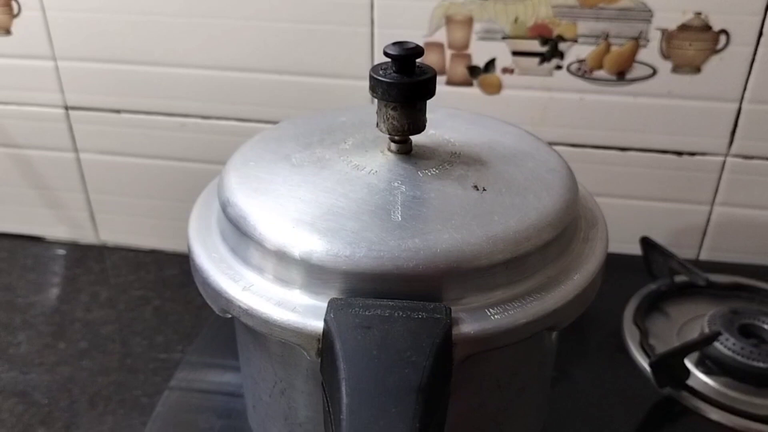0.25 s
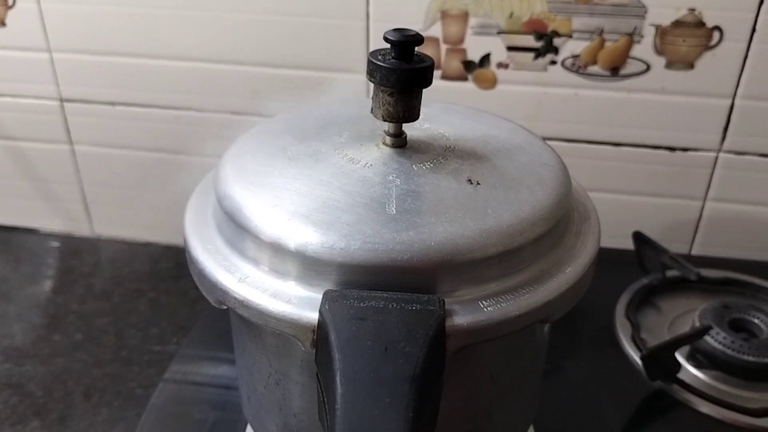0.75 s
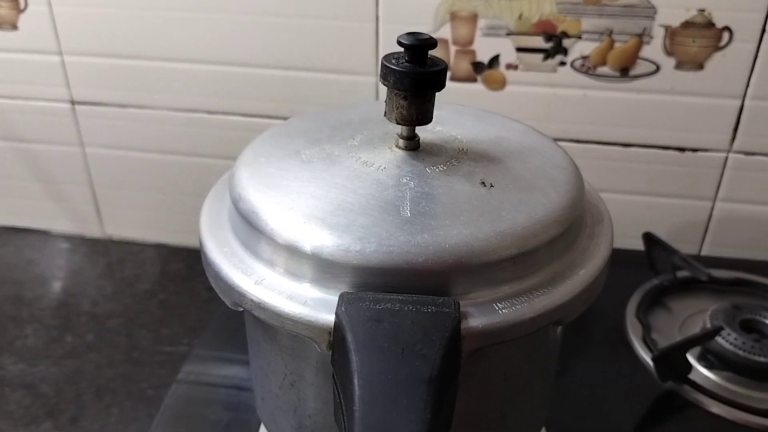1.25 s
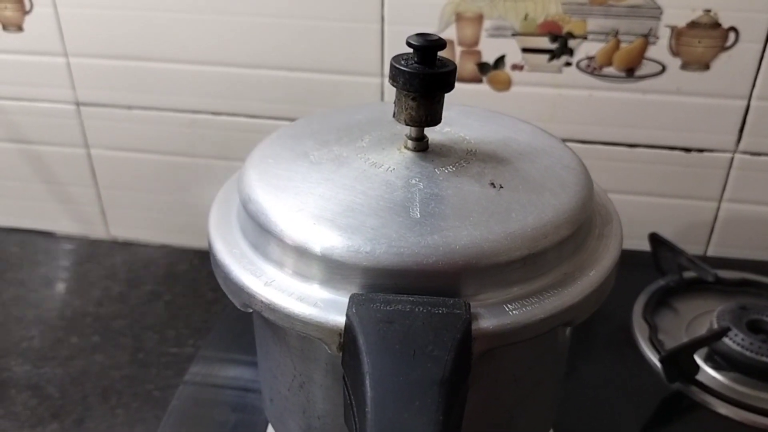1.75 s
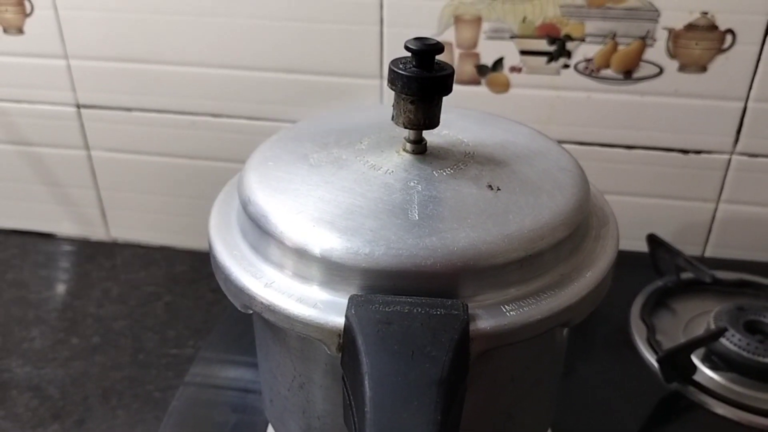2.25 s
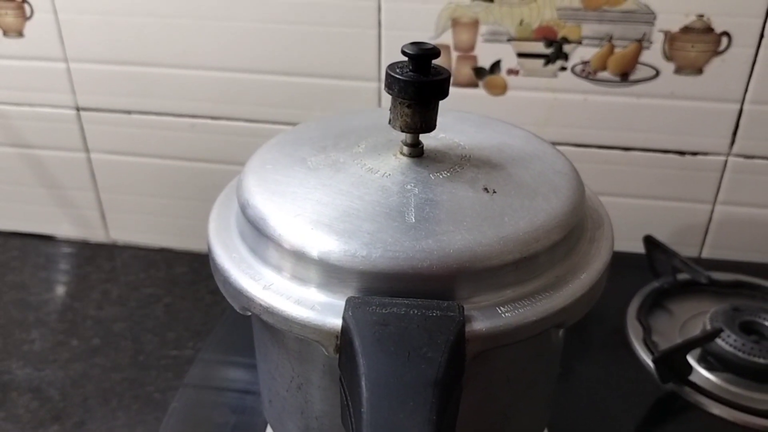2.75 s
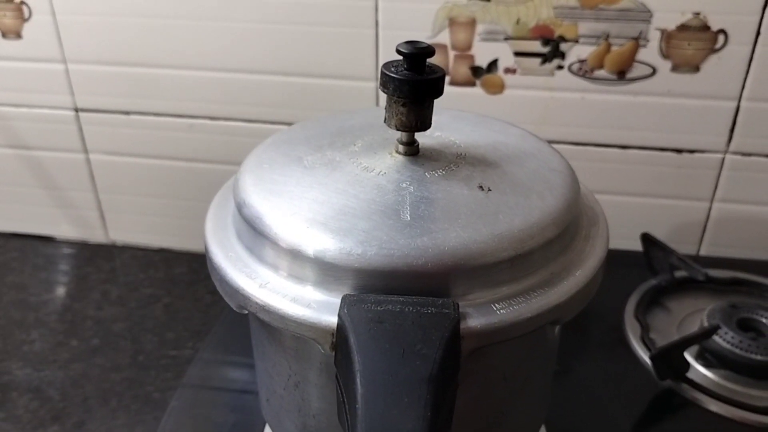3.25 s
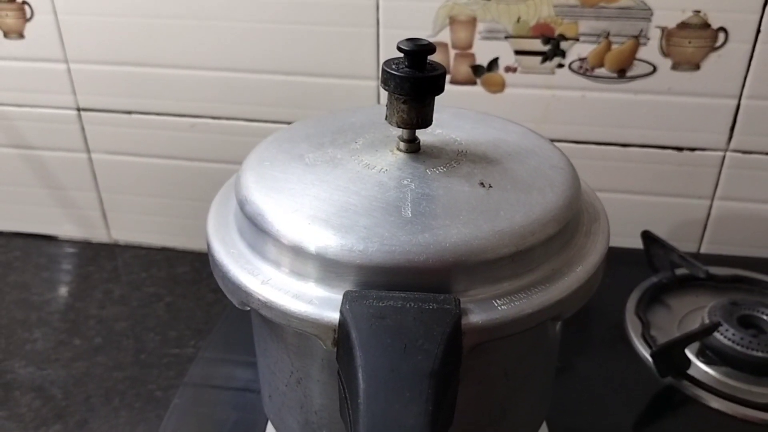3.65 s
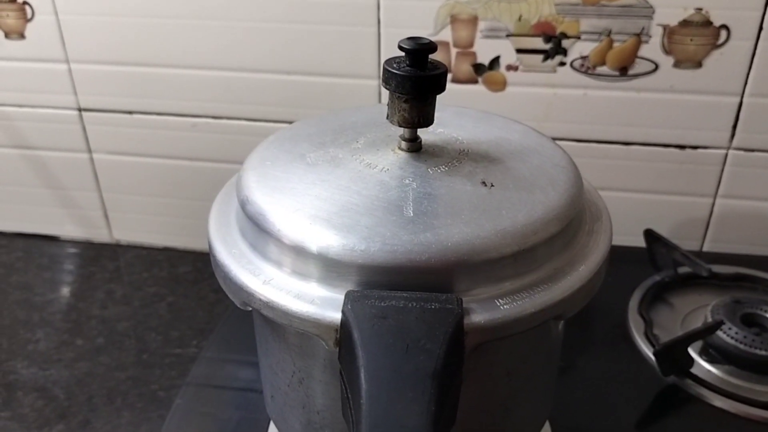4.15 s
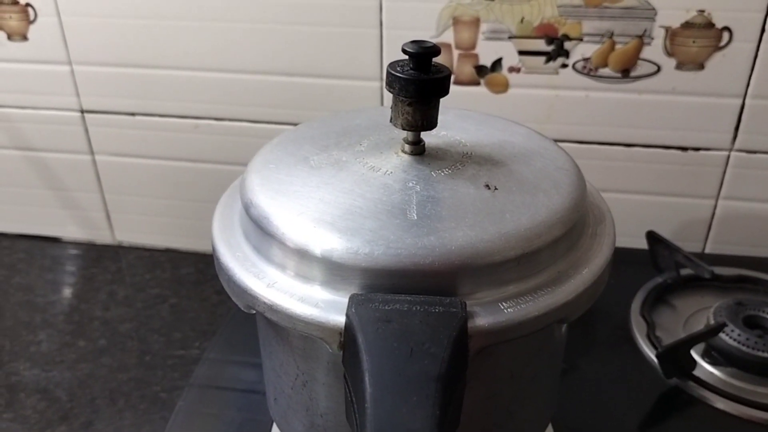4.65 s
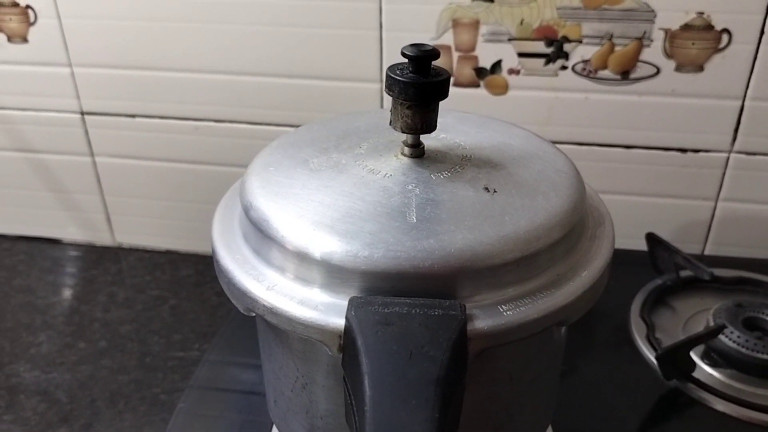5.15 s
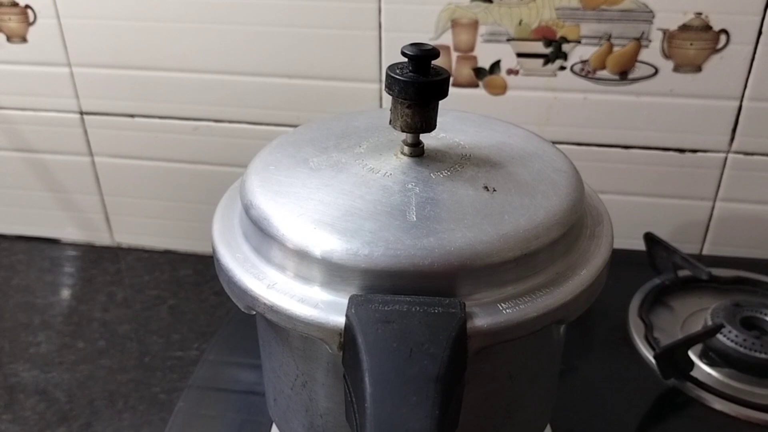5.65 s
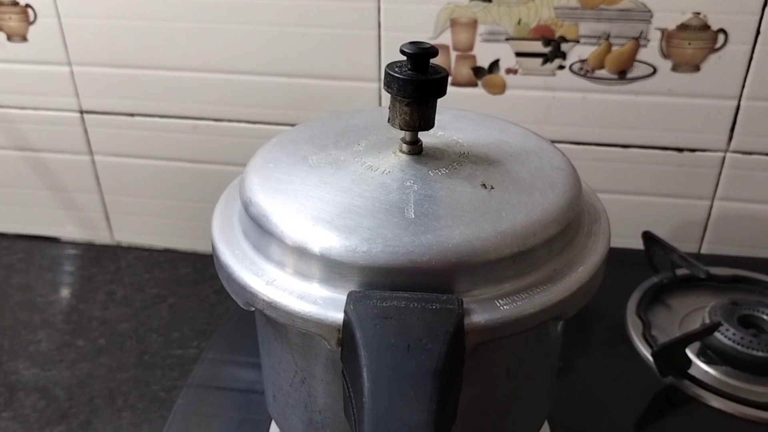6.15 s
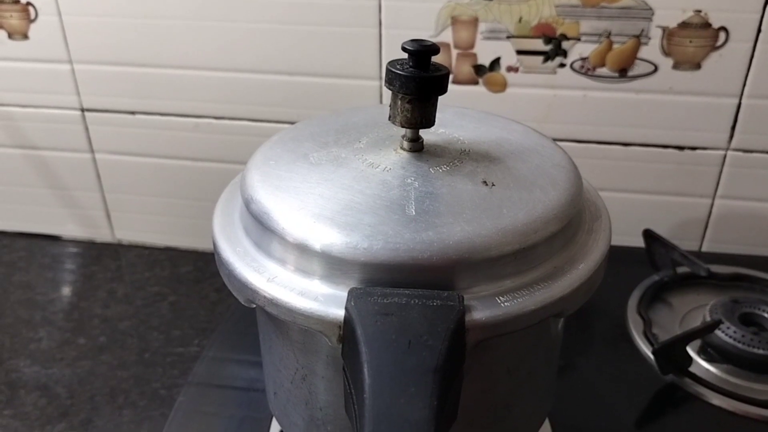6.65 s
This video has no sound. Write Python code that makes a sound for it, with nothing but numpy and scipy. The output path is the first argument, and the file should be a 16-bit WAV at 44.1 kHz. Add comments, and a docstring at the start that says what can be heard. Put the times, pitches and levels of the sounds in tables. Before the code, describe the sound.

From 0 to about 0.16 seconds there is only a faint, low kitchen hum with barely audible thin tones. It cuts to total silence until roughly 0.84 seconds, when a pressure cooker's steam jet arrives abruptly at full blow. The hiss is broad, bright and sizzling, with a hollow ring around the weight and narrow metallic whistle-like colour from vent and lid; an extra shrill edge fades over the first second or so. It softens slightly around 2.5 seconds, then strengthens again by 4 seconds. Steam buffets the close phone microphone: dull, sharp-fronted pops and low rumble, frequent until 2.1 seconds, sparser to about 4, busy again around 4.2-5.2, mostly on the left. From 6.6 seconds the pops crowd together and a tearing, rumbling gust swells, slightly overloaded, as the hiss continues to the end. Tiled walls add short diffuse reflections.

```python
"""A moment of quiet kitchen hum, a silent gap, then a pressure cooker blowing steam past its weight valve.
Filtered noise makes the room and the jet; resonances ring the hollow of the weight, the vent tube and lid.
Tiled walls return the sound as a diffuse field. The phone is so close that eddies of the plume hit its
two microphone ports, each on its own: dull pops from pressure pulses, rumble from low noise.
"""
import sys
import numpy as np
from scipy import signal
from scipy.fft import rfft, irfft, next_fast_len
from scipy.io import wavfile
from scipy.ndimage import uniform_filter1d

SR = 44100
rng = np.random.default_rng(int(sys.argv[2]) if len(sys.argv) > 2 else 0)


def to_wav(sig):
    """Store sig (one row per channel, or 1-D mono) as 16-bit WAV at the path in sys.argv[1].

    Samples outside -1..1 are clipped; the rate is SR.
    """
    pcm = np.clip(np.atleast_2d(sig), -1, 1) * 32767
    pcm = np.round(pcm).astype(np.int16)
    wavfile.write(sys.argv[1], SR, pcm.T)  # frames by channels


N = 304498
TIME = np.arange(N) / SR
SIZE = next_fast_len(N, True)
FREQ = np.maximum(np.fft.rfftfreq(SIZE, 1 / SR), 1)
HUM_END_S, JET_START_S = .161, .835


def undb(db):
    """Logarithmic level: decibels to amplitude gain."""
    return 10 ** (np.asarray(db) / 20)


def level(x, db):
    """Mean power: scale the signal to an rms level."""
    return x * undb(db) / np.sqrt(np.mean(x ** 2))


def curves(table):
    """Linear interpolation: each column of a timed table, sample by sample."""
    times, *columns = np.transpose(table)
    return [np.interp(TIME, times, column) for column in columns]


def shape(x, response):
    """Linear filtering: multiply the spectrum by a response given at every frequency."""
    return irfft(rfft(x, SIZE) * response, SIZE)[..., :N]


def colour(x, outline):
    """Spectral shaping: filter by an f/Hz, level/dB outline, interpolated over log frequency."""
    hz, db = np.transpose(outline)
    return shape(x, undb(np.interp(np.log(FREQ), np.log(hz), db)))


def ring(x, modes):
    """Resonance: modes stirred by turbulence are incoherent, so their powers add."""
    power = 0
    for hz, width, db in modes:
        detuning = hz / width * (FREQ / hz - hz / FREQ)
        power = power + undb(db) ** 2 / (1 + detuning ** 2)
    return shape(x, np.sqrt(power))


def butter(x, hz, kind, order=2):
    """Causal filtering: a Butterworth low-pass or high-pass."""
    return signal.sosfilt(signal.butter(order, hz, kind, fs=SR, output="sos"), x)


def slow_chance(rate_hz):
    """Slow random fluctuation: stepped noise, smoothed, with rms 1."""
    step = max(int(SR / rate_hz), 1)
    steps = np.repeat(rng.standard_normal(N // step + 1), step)
    return level(uniform_filter1d(steps, step)[:N], 0)


# Quiet kitchen noise, relative spectrum: f/Hz, level/dB
ROOM_SPECTRUM = [(20, -22), (50, -7), (85, 0.5), (110, -1), (160, -11), (340, -18), (500, -25), (1100, -25),
                 (2400, -33.5), (4600, -37), (5500, -45), (9000, -50), (15000, -66)]
# Faint thin tones in it, relative peaks: f/Hz, width/Hz, level/dB
THIN_TONES = [(335, 10, 9), (1720, 25, 0), (3100, 63, -3), (3560, 46, -6)]


def quiet_room():
    """Correlation of a sound field: hum and thin noisy tones, with the bass alike at both ports."""
    noise = level(colour(rng.standard_normal((2, N)), ROOM_SPECTRUM), -44)
    tones = level(ring(rng.standard_normal((2, N)), THIN_TONES), -56.5)
    mid, side = noise + tones
    # removing bass from the difference leaves the low end common to both ports
    return mid + butter(side, 500, "high", order=1) * np.array([[1], [-1]])


def pops(rows, length_s, front_s):
    """Pressure pulse: an eddy pushes or sucks at one port; pressure leaks away, so the signal swings back."""
    out = np.zeros((2, N + SR))
    chances = rng.standard_normal((len(rows), 2))
    t = TIME[:SR // 60]
    front = np.exp(-t / front_s)
    for (start_s, push_db, snap_db, port), (way, stretch) in zip(rows, chances):
        # a sharp front, a short hold, then a rounded fall of pressure
        hold = 1 / (1 + (t / (length_s * np.exp(0.15 * stretch))) ** 6)
        push = undb(push_db) * (1 - front) * hold
        snap = undb(snap_db) * front
        i = int(start_s * SR)
        out[int(port > .5), i:i + len(t)] += np.sign(way) * (push + snap)
    leaked = butter(out[:, :N], 11.0, "high")
    return butter(leaked, 4400, "low")


# rate in a draught of GUST_DB, and how steeply the rate follows the draught
EDDY_PER_S, GUST_DB, EDDY_RATE_POWER = 70, -33, .6
# push of the biggest in that draught, its growth in dB per dB of draught,
# range down to the smallest, snap of the front relative to push
EDDY_PUSH_DB, EDDY_GROWTH, EDDY_SCATTER_DB, EDDY_SNAP_DB = -11, 0.52, 20, 2
LEFT_SHARE = .62  # share of these eddies that hit the left port


def eddies(draught_db, count=1400):
    """Random arrivals: the stronger the draught, the more and the harder the lesser eddies come."""
    when, luck, size, side = rng.random((count, 4)).T
    at = (when * (N - 1)).astype(int)
    gust_db = draught_db[at] - GUST_DB
    rate_per_s = EDDY_PER_S * undb(EDDY_RATE_POWER * gust_db)
    hits = luck < rate_per_s * N / SR / count
    push_db = EDDY_PUSH_DB + EDDY_GROWTH * gust_db - EDDY_SCATTER_DB * size
    push_db = np.where(hits, push_db, -np.inf)  # the rest are silent
    return np.column_stack([TIME[at], push_db, push_db + EDDY_SNAP_DB, side > LEFT_SHARE])


# Big eddies that stand out as single pops, before the port filters:
# t/s, push level/dB, snap level of the front/dB, port (0 left, 1 right)
BIG_EDDIES = [(0.839, -9.5, -4.5, 0), (0.876, -5, -1, 0), (0.964, -8, -11, 1), (0.983, -7, -5, 0),
              (1.116, -5, -4, 0), (1.379, -12, -11, 0), (1.402, -6.5, -7, 0), (1.528, -9, -10, 0),
              (1.573, -5.5, -7, 0), (1.698, -6.5, -3, 0), (1.744, -5, -9, 0), (1.865, -7.5, -14, 0),
              (1.991, -6.5, -6, 0), (2.027, -9, -13, 0), (2.148, -14.5, -20, 0), (2.515, -14.5, -15, 0),
              (2.731, -8, -11, 1), (2.771, -14.5, -11, 0), (2.996, -16, -12, 0), (3.189, -9.5, -10, 0),
              (3.467, -12, -7, 0), (3.502, -14, 0.5, 0), (4.151, -11, -11, 0), (4.173, -7, -11, 0),
              (4.261, -17, -2, 0), (4.322, -12.5, -10, 0), (4.437, -16, -9, 0), (4.51, -9, -8, 0),
              (4.587, -9.5, -6, 0), (4.751, -9, -10, 0), (4.85, -7, -7, 0), (4.903, -9, -1, 0),
              (4.912, -4, -4, 0), (4.972, -7, -8, 0), (5.077, -12, -7.5, 0), (5.187, -9.5, -9, 0),
              (5.406, -13, -11, 0), (5.699, -9.5, -8, 1), (5.797, -10, -7, 0), (5.883, -5.5, -7, 0),
              (6.075, -6.5, -2.5, 1), (6.275, -14, -14, 1), (6.665, -10.5, -6, 1), (6.689, -10, -3.5, 0),
              (6.745, -6, -5, 0), (6.757, -6, -3, 0), (6.831, -4, -1, 0), (6.861, -3, -6, 0)]
# Draught of the plume on the ports, relative: t/s, level/dB
DRAUGHT = [(0.95, -36), (1.01, -31.5), (1.21, -35.5), (1.76, -33.5), (2.34, -40), (3.08, -45), (3.33, -38),
           (3.66, -41), (4.14, -33.5), (4.44, -40.5), (4.9, -33.5), (5.15, -41.5), (6.19, -45.5),
           (6.62, -37.5), (6.84, -24), (6.89, -19.5)]
# Rumble of that draught, relative spectrum: f/Hz, level/dB
RUMBLE_SPECTRUM = [(15, -5), (30, 15.5), (75, -7), (130, 2.5), (280, -25), (600, -36), (2000, -52)]
# Tearing of a strong draught at the port edges, relative spectrum: f/Hz, level/dB
TEARING_SPECTRUM = [(60, -20), (130, 5.5), (280, -6.5), (420, -5), (1000, -12.5), (1600, -14), (4000, -35)]


def plume():
    """Turbulent pressure on the ports: big eddies pop, lesser ones patter, and the draught rumbles."""
    draught_db, = curves(DRAUGHT)
    rumble = level(colour(rng.standard_normal((2, N)), RUMBLE_SPECTRUM), -0.58)
    rumble = rumble * undb(draught_db + 4.7 * slow_chance(22))
    # tearing grows faster than the draught itself
    tearing = level(colour(rng.standard_normal((2, N)), TEARING_SPECTRUM), 11.7)
    tearing = tearing * undb(1.458 * draught_db + 3.4 * slow_chance(90))
    big = pops(BIG_EDDIES, length_s=0.0032, front_s=0.00014)
    lesser = pops(eddies(draught_db), length_s=0.0033, front_s=0.0003)
    # the left port faces the steam
    return big + lesser + (rumble + tearing) * undb([[1], [-2]])


def turbulence(count=3):
    """Incoherent sources: unrelated noise for the direct path and for the diffuse field at each port."""
    return rng.standard_normal((count, N))


def kitchen(paths, lag_ms, wet_db):
    """Direct and diffuse fields: direct sound is later at the right port; the tiles' return is unrelated."""
    delay = np.exp(-2j * np.pi * FREQ * lag_ms / 10 ** 3)
    direct = np.array([paths[0], shape(paths[0], delay)])
    return level(direct, 0) + level(paths[1:], wet_db)


ECHO_T60_S = 0.096


def echoes(x, echo_db):
    """Reverberant decay: short returns from wall and counter, different at each port."""
    t = TIME[:SR // 8]
    tail = rng.standard_normal((2, len(t))) * np.exp(-np.log(1000) * t / ECHO_T60_S)
    returned = signal.oaconvolve(x, tail, axes=1)[:, :N]
    return level(x, 0) + level(returned, echo_db)


def lift(x, low_hz, high_hz, db):
    """Band modulation: what one band gains or loses as its level moves about its median."""
    band = shape(x, 1 / (1 + (low_hz / FREQ) ** 12) / (1 + (FREQ / high_hz) ** 12))
    return band * (undb(db - np.median(db)) - 1)


# Steam jet, relative: t/s, whole-jet level/dB, then levels whose moves about their medians count:
# valve range level/dB, sizzle level/dB, top treble level/dB, left minus right/dB
JET = [(0.87, -26.5, 5.2, 1.5, 3.06, -1.5), (1.02, -28, 5, 2.7, 4.9, -0.5),
       (1.42, -30, 3.4, 3.6, 2.4, 0.82), (1.57, -31, 3.8, 3.3, 5.7, 0.31), (2.49, -32.5, 4.9, 3.4, 5.7, 0),
       (3.91, -28.5, 2.2, 0.35, 3, 0.19), (4.95, -28.5, 2.45, 2, 2.4, 0.26),
       (6.22, -28, 2.4, 2.5, 3.7, -0.34), (6.79, -25.5, 0.35, 4.5, 1.6, 0), (6.87, -26, 2.8, 5.3, 4, -1)]
# Turbulent hiss, relative spectrum: f/Hz, level/dB
HISS_SPECTRUM = [(100, -6), (400, -11.5), (900, -10), (1300, -8.5), (1750, -11.5), (2250, -4.5),
                 (2600, 0.7), (3500, -4.5), (4600, 0.5), (7000, .5), (9500, 0.5), (11600, 0), (13800, -4),
                 (15600, -2)]
# Hollow under the weight, relative peaks: f/Hz, width/Hz, level/dB
VALVE_MODES = [(3630, 270, -3), (3980, 410, -1.5), (4220, 230, -1)]
# Narrow resonances of vent tube and lid, relative peaks: f/Hz, width/Hz, level/dB
LID_MODES = [(1890, 93, -1), (2930, 200, -1), (3545, 23, 7), (4840, 160, -3.5), (5770, 150, 9.5),
             (6900, 200, -2), (8300, 25, -21), (8650, 51, 2.5), (11320, 190, 4)]
# Narrow gap of the weight when it has only just lifted, relative peaks: f/Hz, width/Hz, level/dB
GAP_MODES = [(1990, 360, -1.5), (3430, 130, -1), (3950, 220, -16), (6300, 400, -2), (10950, 600, 10),
             (11800, 400, -8.5), (14900, 600, -8)]
# Shading of the left port by the phone's body, relative: f/Hz, level/dB
LEFT_SHADE = [(1000, -5), (2100, -1), (2700, -0.5), (3600, 0), (4200, 0), (5400, -1), (6200, -0.5),
              (7700, 1.5), (9000, -9.5), (9800, -3.5), (11000, -3), (12200, 1.5), (13500, 1.5),
              (15500, -20.5)]
# Shading of the right port by the phone's body, relative: f/Hz, level/dB
RIGHT_SHADE = [(1000, -0.29), (4500, 0.37), (5250, 0.48), (5900, -2.2), (7000, -1), (9000, 0.65),
               (12000, 0.11), (15500, 1.2)]
SETTLE_S = 1  # time constant with which the ringing of the narrow gap dies down


def steam():
    """Jet noise exciting resonators: broad hiss, the valve's hollow and thin lid modes ride on one flow."""
    jet_db, valve_db, sizzle_db, top_db, pan_db = curves(JET)
    hiss = kitchen(colour(turbulence(), HISS_SPECTRUM), lag_ms=1.05, wet_db=6.5)
    hollow = butter(ring(turbulence(), VALVE_MODES), 2250, "high", order=4)
    hollow = kitchen(hollow, lag_ms=.3, wet_db=-18.0)
    lid = kitchen(ring(turbulence(), LID_MODES), lag_ms=0.274, wet_db=1.0)
    gap = kitchen(ring(turbulence(), GAP_MODES), lag_ms=0.257, wet_db=-3)
    fresh = np.exp(-np.maximum(TIME - JET_START_S, 0) / SETTLE_S)
    jet = level(hiss, 0) + level(hollow, -8.5) + level(lid, -11.5) + fresh * level(gap, -6)
    left, right = echoes(jet, echo_db=-6.5)
    jet = level(np.array([colour(left, LEFT_SHADE), colour(right, RIGHT_SHADE)]), 11.37)
    # the weight rides on the jet, so the gap and with it the brightness shift
    valve_shift = lift(jet, 200, 5100, valve_db)
    sizzle_shift = lift(jet, 5200, 6900, sizzle_db)
    top_shift = lift(jet, 10500, 18000, top_db)
    jet = jet + valve_shift + sizzle_shift + top_shift
    flutter_db = 0.46 * slow_chance(25)
    balance_db = np.array([[.5], [-.5]]) * (pan_db - np.median(pan_db))
    return jet * undb(jet_db + flutter_db + balance_db)


def scene():
    """Superposition: the quiet room stops short; after a silent gap the cooker is already at full blow."""
    before = np.clip((HUM_END_S - TIME) / 0.0024, 0, 1)
    after = np.clip((TIME - JET_START_S) / 0.0016, 0, 1)
    return before * quiet_room() + after * (steam() + plume())


TOP_HZ = 15750


def record(dry):
    """Overload and band limiting: the phone clips the highest peaks and cuts the top."""
    clipped = np.clip(dry, -1, 1)
    return signal.sosfilt(signal.ellip(12, .1, 80, TOP_HZ, fs=SR, output="sos"), clipped)


dry = scene()
out = record(dry)
to_wav(out)
```